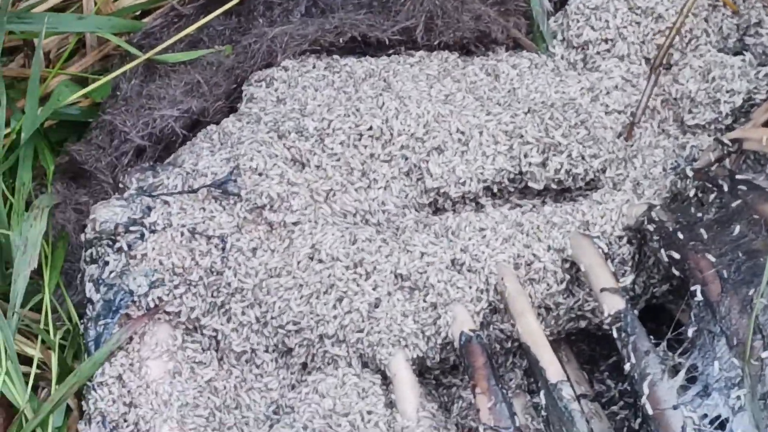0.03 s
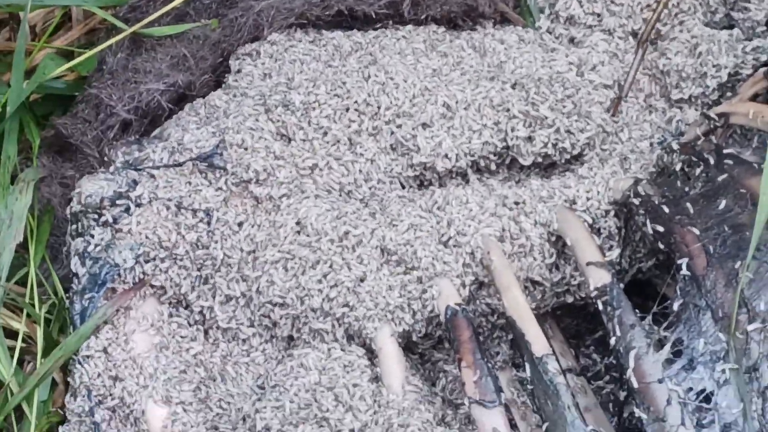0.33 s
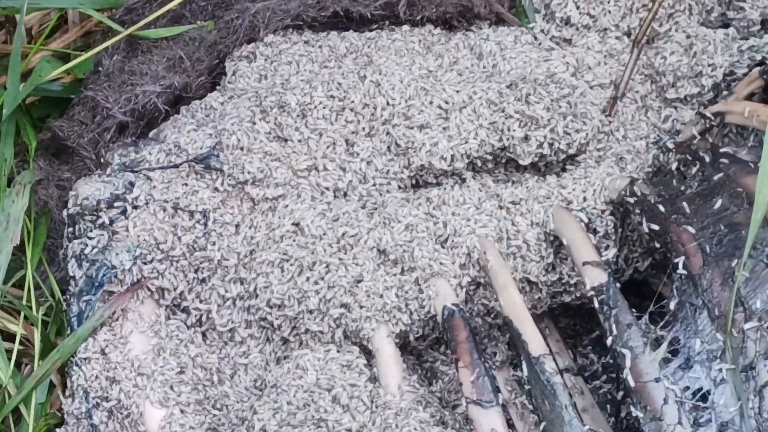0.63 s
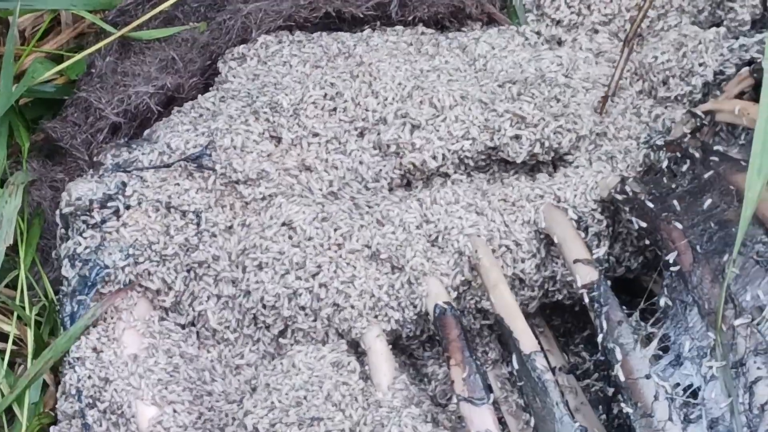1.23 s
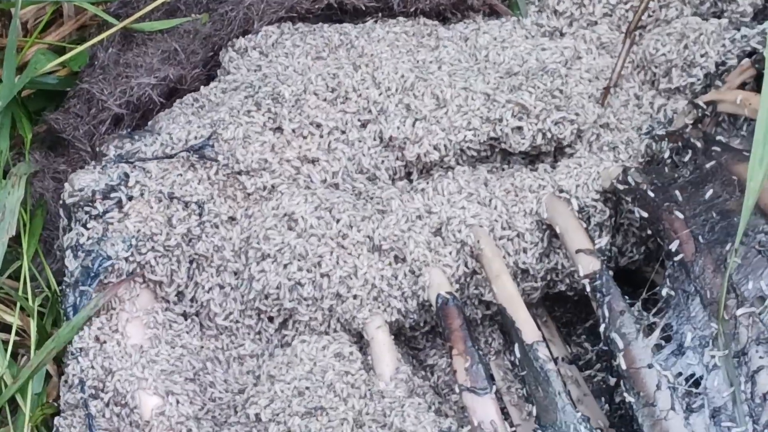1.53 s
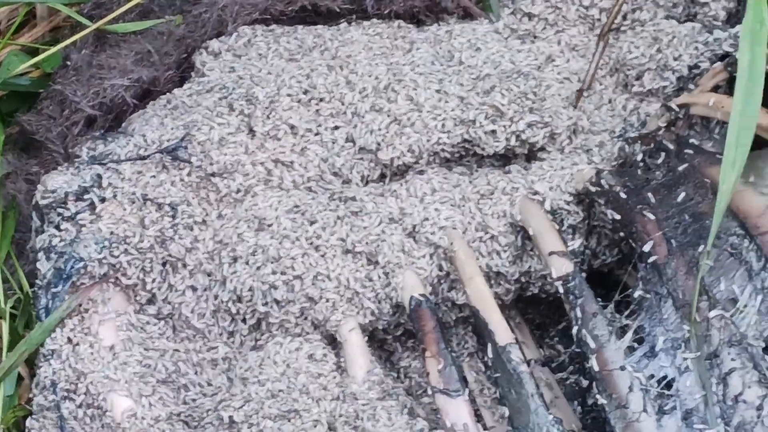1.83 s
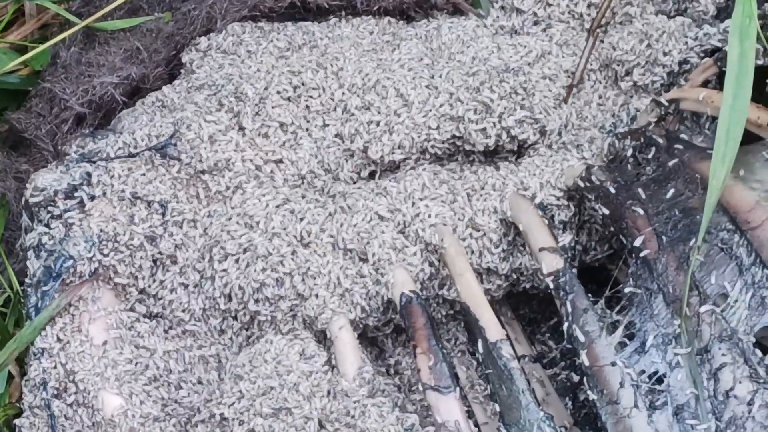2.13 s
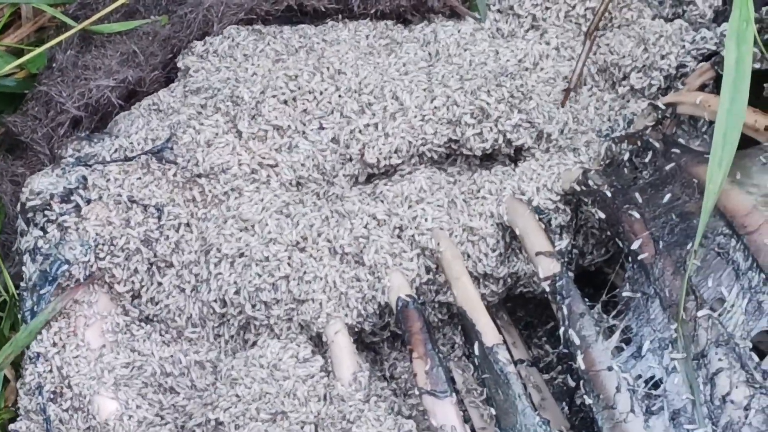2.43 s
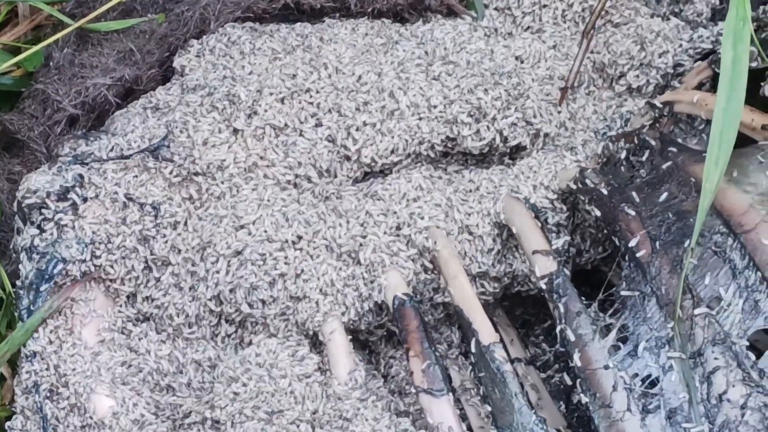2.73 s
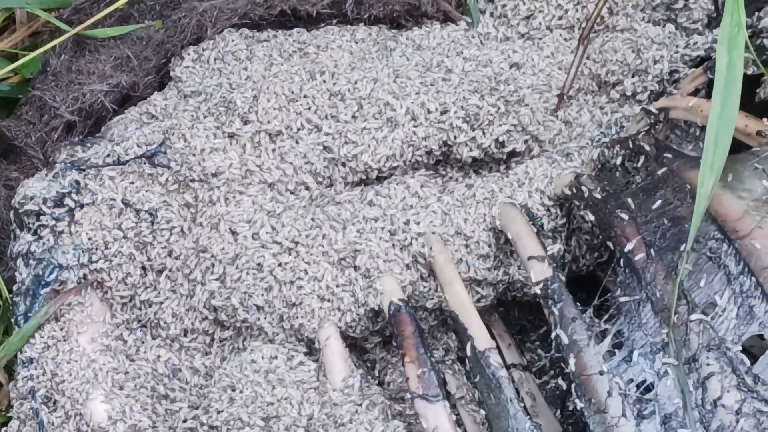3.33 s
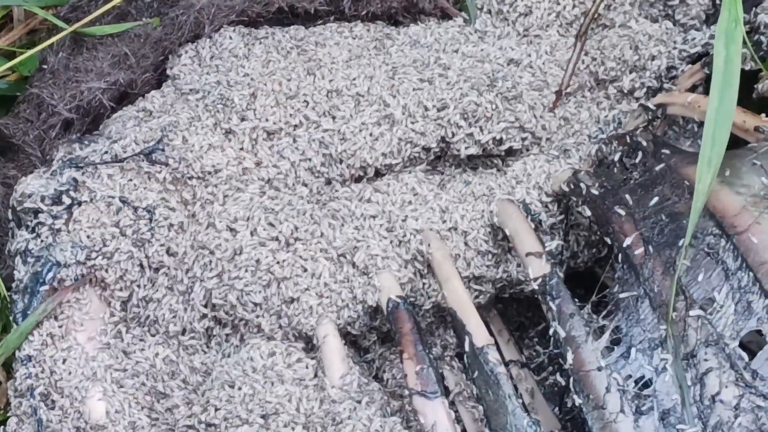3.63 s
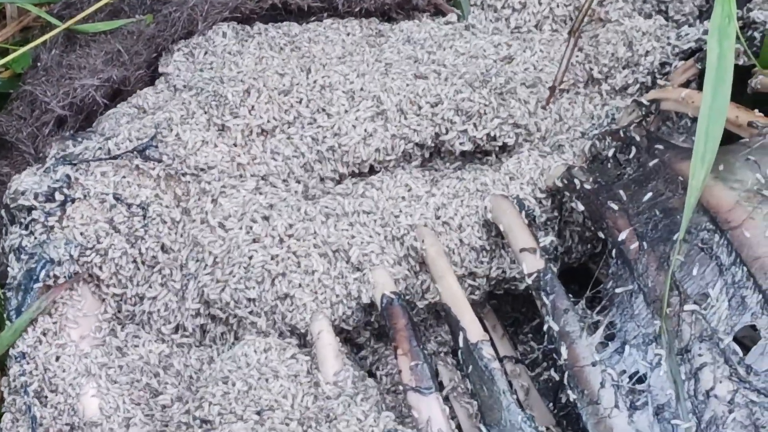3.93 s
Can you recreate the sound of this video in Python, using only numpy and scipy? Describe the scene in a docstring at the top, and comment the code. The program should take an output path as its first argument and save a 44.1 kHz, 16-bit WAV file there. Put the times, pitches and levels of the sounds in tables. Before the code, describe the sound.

A mass of maggots rustles close by throughout, a faint, moist crackle of tiny clicks blended with outdoor hiss. Far traffic rumbles with a low engine drone. A small bird peeps on the left three times a second. Short rasping bird calls come around 0.3, 2.4 and 3.3 seconds, and distant echoing whistles follow from 3.3 seconds. Two tiny sharp ticks sound at 2.6 and 3.5 seconds.

```python
"""A fine, steady, moist rustle with a rare sharp tick: a mass of maggots seethes in the grass close by.
The rustle is thousands of tiny clicks and pops a second, blended with the hiss of the outdoor air.
Far traffic rumbles and an engine drones. A small bird peeps three times a second, a jackdaw-like bird
gives short rasping calls, and farther birds whistle. The birds' gliding tones echo from the trees."""
import sys
import numpy as np
from scipy import signal
from scipy.fft import rfft, irfft
from scipy.io import wavfile

SR = 44100
rng = np.random.default_rng(int(sys.argv[2]) if len(sys.argv) > 2 else 0)


def int16_out(signal):
    """Quantize to a 16-bit WAV file."""
    q = np.round(np.clip(np.atleast_2d(signal).T, -1, 1) * 32767)
    wavfile.write(sys.argv[1], SR, q.astype(np.int16))


N = 176400
TIME, FREQS = np.arange(N) / SR, np.fft.rfftfreq(N, 1 / SR)


def amp(db):
    """Turns decibels into a gain to multiply by."""
    return 10 ** (np.asarray(db) / 20)


def unit(x):
    """Scales a signal to an average (rms) size of 1."""
    return x / np.sqrt(np.mean(x ** 2) + 1e-20)


def read(table, hz, column=1):
    """Looks up a table's column at any frequency, on a logarithmic frequency scale."""
    table = np.array(table)
    return np.interp(np.log(hz + 1), np.log(table[:, 0] + 1), table[:, column])


def drift(count, rate_hz):
    """A smooth random wander of size about 1; a higher rate makes it move faster."""
    spectrum = rfft(rng.standard_normal(N)) * np.exp(-(FREQS / rate_hz) ** 2)
    return unit(irfft(spectrum, N))[:count]


def noise_pair(likeness):
    """White noise spectra for two ears: likeness 1 is the same, 0 unrelated, -1 opposite."""
    left, other = rfft(rng.standard_normal((2, N)))
    return np.array([left, likeness * left + np.sqrt(1 - likeness ** 2) * other])


def tone(hz):
    """A pure tone that follows a changing pitch."""
    return unit(np.sin(2 * np.pi * np.cumsum(hz) / SR))


def fade(t, length_s, rise_s, fall_s):
    """Fades a note in, holds it and fades it out."""
    return np.clip(t / rise_s, 0, 1) * np.clip((length_s - t) / fall_s, 0, 1)


def add(mix, start_s, sound, pan_db):
    """Places a sound in time; a positive pan turns the right ear down, a negative one the left."""
    part = mix[:, max(round(start_s * SR), 0):][:, :len(sound)]
    part += amp([[min(pan_db, 0)], [min(-pan_db, 0)]]) * sound[:part.shape[1]]


def trees(sound, decay_s, echo_db):
    """Adds scattered echoes from the trees, which die away by 60 dB in decay_s."""
    echoes = rng.standard_normal((2, SR)) * (rng.random((2, SR)) < 0.05) * amp(-60 * TIME[:SR] / decay_s)
    echoes /= np.linalg.norm(echoes, axis=1, keepdims=True)
    return sound + amp(echo_db) * signal.fftconvolve(sound, echoes, axes=1)[:, :N]


def traffic(waver_hz=2.0, flutter_db=1.5, wander_db=1.12):
    """A far road rumbles, and one engine's low drone fades in and out."""
    # tone colour of the rumble (frequency [Hz], level [dB per Hz])
    rumble_colour = [(10, -94), (24, -88), (36, -78.5), (52, -69), (62, -68), (85, -72.5), (120, -76.5),
                     (165, -86), (210, -88), (300, -106), (600, -130)]
    # swells and dips of the rumble (time [s], level [dB])
    rumble_level = [(0, 0), (.5, -0.5), (.92, 0.5), (1.04, -5), (1.12, -1), (1.5, -3), (1.8, -1),
                    (2.05, -1.5), (2.4, 2), (2.85, -8), (3.1, 1), (3.25, -4), (3.35, 0.5), (3.6, 1.5),
                    (4, -1.5)]
    # the engine's drone (time [s], pitch [Hz], level [dB])
    engine = [(0, 72.1, -52.5), (.5, 70.3, -57), (1, 73.64, -62.5), (1.12, 74.8, -51.5), (1.28, 75, -71),
              (1.6, 73.2, -57), (1.85, 74.3, -46), (2, 76.3, -77), (2.12, 75.85, -46.5),
              (2.28, 76.04, -57.5), (2.42, 75.54, -46), (2.55, 76.5, -59), (2.74, 75.4, -47),
              (2.87, 74.9, -64), (2.95, 75.33, -52), (3.14, 76.37, -47.5), (3.25, 76.96, -58),
              (3.31, 77, -51), (3.7, 78.37, -53.5), (4, 78.8, -52.5)]
    rumble = irfft(noise_pair(likeness=0.9) * amp(read(rumble_colour, FREQS)), N) * np.sqrt(SR / 2)
    times, hz, db = np.transpose(engine)
    drone = tone(np.interp(TIME, times, hz) + waver_hz * drift(N, 8.7))
    drone *= amp(np.interp(TIME, times, db) + flutter_db * drift(N, 25.0))
    swell_db = np.interp(TIME, *np.transpose(rumble_level)) + wander_db * drift(N, 7.7)
    return rumble * amp(swell_db) + drone * amp([[0], [-2]])


def whistles(notes, waver, rise_s, fall_s, quaver=0, quaver_hz=0):
    """Gliding notes; the random waver and the regular quaver are fractions of the pitch."""
    out = np.zeros((2, N))
    for start_s, length_s, start_hz, end_hz, db, pan_db in notes:
        t = np.arange(0, length_s, 1 / SR)
        glide_hz = start_hz + (end_hz - start_hz) * t / length_s
        wobble = 1 + waver * drift(len(t), 182) + quaver * np.sin(2 * np.pi * quaver_hz * t)
        add(out, start_s, amp(db) * tone(glide_hz * wobble) * fade(t, length_s, rise_s, fall_s), pan_db)
    return out


def far_birds():
    """Whistles from far away, blurred by echoes that are stronger than the notes themselves."""
    # a whistling bird's notes
    # (time [s], length [s], start pitch [Hz], end pitch [Hz], level [dB], left minus right [dB])
    whistled_notes = [(3.293, 0.11, 2200, 2232, -52.5, 3.5), (3.418, 0.086, 2225, 2100, -55.5, 1),
                      (3.495, 0.068, 2165, 2181, -58, 2.5), (3.573, 0.14, 2020, 2079, -55, -3.5),
                      (3.76, 0.0733, 2180, 2082, -57.5, -1), (3.85, 0.063, 2125, 2125, -67, -1)]
    # thin notes of a farther songbird, same columns
    thin_notes = [(0, 0.13, 3290, 3090, -62, -7), (0, 0.099, 2850, 2610, -65, -3),
                  (.62, 0.22, 3400, 3390, -69, -5), (.79, .15, 3244, 3070, -63.5, -9),
                  (1.07, .12, 3090, 2987, -65.5, -10)]
    # faint low notes, same columns
    low_notes = [(1.52, 0.142, 860, 796, -68.5, 0), (3.07, 0.112, 990, 968, -64.5, 0.00029)]
    whistler = whistles(whistled_notes, waver=0.012, rise_s=0.024, fall_s=0.019,
                        quaver=0.011, quaver_hz=25.28)
    out = trees(whistler, decay_s=0.84, echo_db=1.5)
    songbird = whistles(thin_notes, waver=0.0298, rise_s=0.012, fall_s=0.018)
    out += trees(songbird, decay_s=1.0, echo_db=6.0)
    low_voice = whistles(low_notes, waver=0.078, rise_s=0.04, fall_s=0.042)
    return out + trees(low_voice, decay_s=0.63, echo_db=1.0)


def caws(waver=0.017):
    """A jackdaw-like bird's short falling calls: a buzzy tone and noise, shaped by the throat."""
    # parts of the calls (time [s], length [s], start pitch [Hz], end pitch [Hz], level [dB],
    # left minus right [dB], roughness [0-1])
    syllables = [(.314, 0.0317, 1311, 1148, -50.5, 3, 0.17), (.335, 0.0252, 1120, 850, -53, 8, 0.42),
                 (2.413, 0.027, 1330, 1197, -53, 7, .05), (2.469, 0.031, 1501, 1220, -57.5, -7, 0.85),
                 (2.692, .06, 1284, 1065, -62, 6, 0.65), (3.344, 0.054, 1391, 1130, -56, 3, 0.75)]
    # how the throat boosts or weakens the voice (frequency [Hz], gain [dB])
    throat = [(600, -9), (1250, -4), (1750, -1.5), (2500, 4.5), (3000, 3), (3700, -5.5), (4600, -12),
              (8000, -47)]
    out = np.zeros((2, N))
    for start_s, length_s, start_hz, end_hz, db, pan_db, rough in syllables:
        t = np.arange(0, length_s, 1 / SR)
        glide_hz = start_hz + (end_hz - start_hz) * t / length_s
        cycles = np.cumsum(glide_hz * (1 + waver * drift(len(t), 400))) / SR
        buzz = unit(sum(np.cos(2 * np.pi * harmonic * cycles) for harmonic in range(1, 5)))
        rasp = (1 - rough) * buzz + 2 * rough * rng.standard_normal(len(t))
        throat_gain = amp(read(throat, np.fft.rfftfreq(len(t), 1 / SR)))
        call = unit(irfft(rfft(rasp) * throat_gain, len(t)))
        add(out, start_s, amp(db) * call * fade(t, length_s, rise_s=0.013, fall_s=0.0057), pan_db)
    return trees(out, decay_s=0.62, echo_db=1.5)


def peeps(jitter_hz=20, flutter_db=0.6, after_hz=5615):
    """A small bird on the left: each slightly rough peep steps up in pitch, then a faint note follows."""
    # the peeps (time [s], level [dB])
    peep_times = [(0.013, -54.5), (.364, -53.5), (.711, -55), (1.059, -54.5), (1.408, -54), (1.738, -55),
                  (2.094, -55), (2.434, -53), (2.766, -54), (3.115, -53.5), (3.459, -55), (3.801, -53)]
    # pitch within a peep: two small arches, the second higher (time [s], pitch [Hz])
    peep_pitch = [(0, 5200), (.011, 5275), (.016, 5235), (.022, 5355), (.033, 5395), (.046, 5320)]
    out = np.zeros((2, N))
    t = TIME[:SR // 8]
    for start_s, db in peep_times:
        hz = np.interp(t, *np.transpose(peep_pitch)) + jitter_hz * drift(len(t), 300)
        peep = tone(hz) * fade(t, length_s=0.046, rise_s=0.0029, fall_s=0.0096)
        add(out, start_s, amp(db + flutter_db * drift(len(t), 250)) * peep, pan_db=12.5)
        after_note = tone(after_hz + 55 * drift(len(t), 150))
        after_note *= fade(t, length_s=0.055, rise_s=0.019, fall_s=0.015)
        after_db = -70 + 3.5 * rng.standard_normal()
        add(out, start_s + 0.12, amp(after_db) * after_note, pan_db=13)
    return trees(out, decay_s=0.96, echo_db=-11.5)


def ticks(width_s=0.00022):
    """Single sharp, very high ticks in the mass of maggots, close by on the left."""
    # the ticks (time [s], peak level [dB], pitch [Hz])
    tick_times = [(2.636, -42, 12800), (3.483, -34, 13690)]
    out = np.zeros((2, N))
    t = TIME[:SR // 500] - 0.001  # the tick peaks at t = 0
    for peak_s, db, hz in tick_times:
        tick = np.exp(-(t / width_s) ** 2) * np.cos(2 * np.pi * hz * t)
        add(out, peak_s + t[0], amp(db) * tick, pan_db=28)
    return out


def pops(per_s=1300, spread_db=2.5, cycles=5.4, low_hz=2640, high_hz=14540, pitches=24):
    """Tiny wet pops at random times in each ear, each only a few cycles of one pitch."""
    t = TIME[:SR // 200] - 0.0025
    sizes = amp(spread_db * np.minimum(rng.exponential(1, (2, N)), 3))
    hits = sizes * (rng.random((2, N)) < per_s / SR)
    pitch_choice = rng.integers(0, pitches, (2, N))
    out = np.zeros((2, N))
    for k, hz in enumerate(np.linspace(low_hz, high_hz, pitches)):
        pop = unit(np.exp(-(2 * hz * t / cycles) ** 2) * np.sin(2 * np.pi * hz * t))
        out += signal.oaconvolve(hits * (pitch_choice == k), pop[None], "same", axes=1)
    return unit(out)


def maggots(clicks_per_s=5000, spread_db=3, pop_db=-12, swell_db=0.4, flutter_db=0.6, low_cut_hz=200):
    """The maggots' countless moist clicks and pops merge with the outdoor hiss into one rustle."""
    # tone colour of rustle and air (frequency [Hz], left level [dB per Hz], right level [dB per Hz])
    rustle_colour = [(249, -87, -90), (396, -92.5, -99.8), (602, -95.5, -99.5), (794, -93.0, -89.5),
                     (1020, -86.5, -90.5), (1306, -93, -96), (1645, -91.5, -92.5), (2040, -100.9, -94.5),
                     (2560, -97, -90.5), (3130, -95.5, -87.5), (3630, -99, -89.5), (4230, -89.5, -92),
                     (4800, -96, -100.1), (5340, -93, -106.7), (5900, -97.5, -116.0), (7530, -97, -125.9),
                     (8300, -107.4, -118.3), (9200, -110.6, -117.2), (11200, -102.9, -112.0),
                     (12840, -94, -119.1), (14800, -102.7, -123.0), (16400, -106.0, -126.8)]
    # the clicks' part of the power in the blend of clicks and hiss (frequency [Hz], share [0-1])
    click_share = [(1000, 0.03), (3000, 0.29), (7000, 0.27), (12500, 0.63)]
    # how alike the hiss is in the two ears (frequency [Hz], likeness [-1 to 1])
    air_likeness = [(250, 1), (600, 0.54), (1000, 0.3), (1400, -0.5), (2000, -0.38), (2400, 0.23),
                    (3400, -0.012), (4300, -0.0083), (6000, -0.16)]
    # gentle rise and fall of the rustle (time [s], level [dB])
    rustle_level = [(0, 0.5), (1.3, -1), (2.2, -0.1), (3, -1), (3.45, 1), (4, 0.45)]
    sizes = amp(spread_db * np.minimum(rng.exponential(1, (2, N)), 4))
    clicks = unit(sizes * rng.choice([-1, 1], (2, N)) * (rng.random((2, N)) < clicks_per_s / SR))
    hiss = noise_pair(read(air_likeness, FREQS))
    share = read(click_share, FREQS)
    spectrum = np.sqrt(share) * rfft(clicks) + np.sqrt(1 - share) * hiss
    spectrum += amp(pop_db) * rfft(pops())
    spectrum /= np.hypot(1, amp(pop_db))  # the pops leave the total power the same
    colour = amp([read(rustle_colour, FREQS, column=1), read(rustle_colour, FREQS, column=2)])
    low_cut = 1 - np.exp(-(FREQS / low_cut_hz) ** 4)
    level_db = np.interp(TIME, *np.transpose(rustle_level))
    level_db += swell_db * drift(N, 1.9) + flutter_db * drift(N, 15.5)
    return irfft(spectrum * colour * low_cut, N) * np.sqrt(SR / 2) * amp(level_db)


def scene():
    """The near rustle, the birds around it and the far road."""
    return far_birds() + maggots() + ticks() + traffic() + peeps() + caws()


def record(dry, cutoff_hz=15800):
    """Cuts off the very highest treble."""
    low_pass = signal.firwin(1023, cutoff_hz, window=("kaiser", 9), fs=SR)
    return signal.oaconvolve(dry, low_pass[None], "same")


dry = scene()
out = record(dry)
int16_out(out)
```